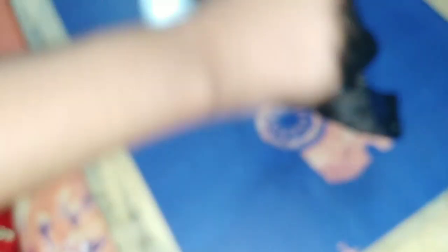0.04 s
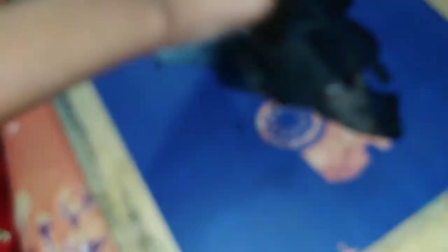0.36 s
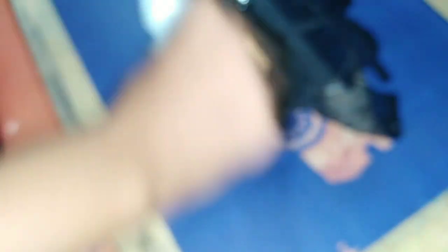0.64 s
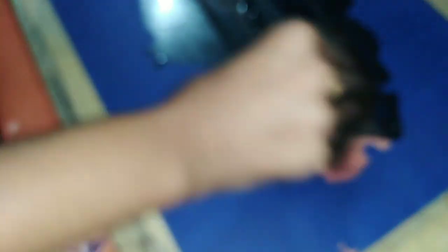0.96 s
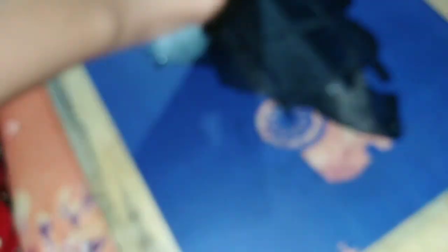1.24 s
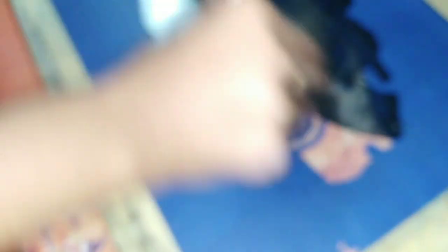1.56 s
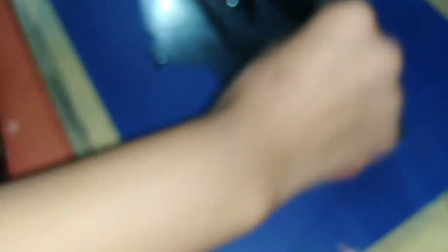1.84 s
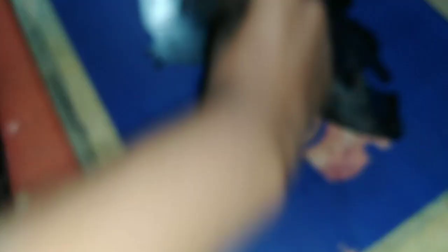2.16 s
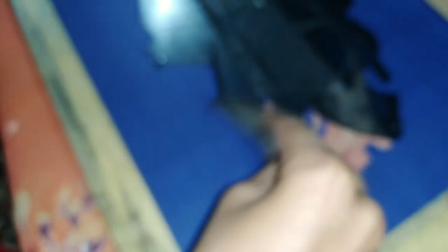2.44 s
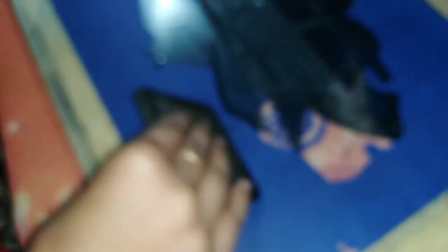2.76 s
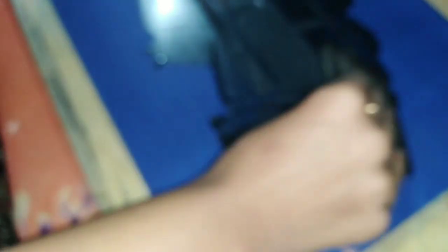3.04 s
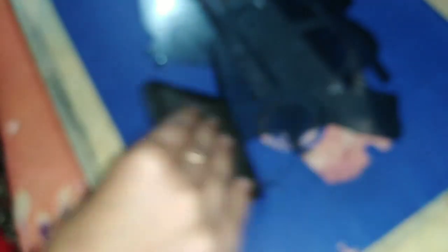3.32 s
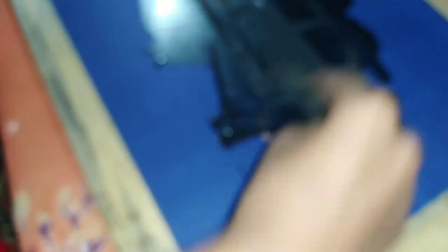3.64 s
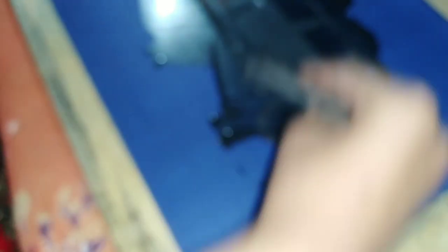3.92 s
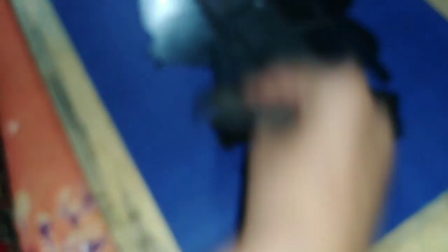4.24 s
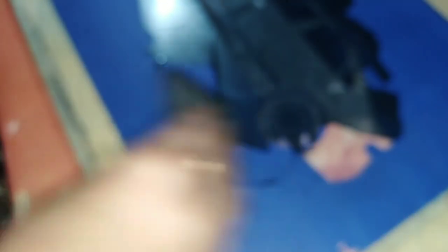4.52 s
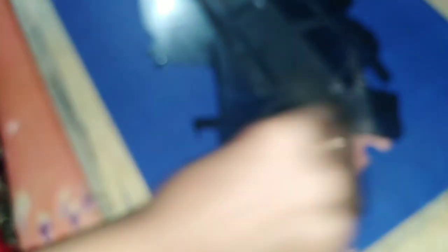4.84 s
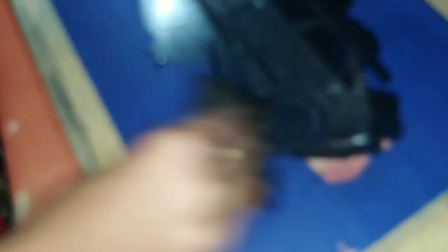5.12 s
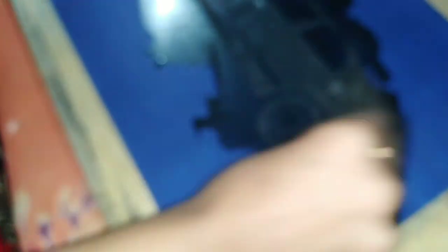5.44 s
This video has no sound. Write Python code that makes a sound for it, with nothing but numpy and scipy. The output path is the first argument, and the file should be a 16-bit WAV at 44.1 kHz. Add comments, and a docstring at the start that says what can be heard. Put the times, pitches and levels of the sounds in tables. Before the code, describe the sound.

A hand-held squeegee ticks down on a mesh stencil and scrapes ink across it, close to the microphone in a small, quiet room. Five short strokes come at about 0.2, 0.4, 0.8, 1.2 and 1.7 seconds. Each is a bright, scratchy hiss that swells and fades, with a high zip rising and falling as the blade crosses the threads, and tiny squeaks where it bites. A sharp tick lands at about 1.6 seconds. Around 2 seconds the hand rests, and the frame and cloth shuffle softly. Nine more strokes follow: one at 2.4 seconds, a quick run of four between 3.1 and 3.9, single ones at 4.4 and 4.9, and a fast pair at 5.3 and 5.5. Light ticks and soft knocks of the frame fall among them, notably just after 4 seconds and at 5 seconds.

```python
"""A hand-held squeegee inks fabric through a mesh stencil, close to a stereo microphone in a small room.
The blade ticks down and scrapes to and fro five times. The hand's speed sets how loud it hisses and how
high it zips across the threads; where it bites, it squeaks. Around two seconds in, the hand rests and
frame and cloth shuffle. Nine more strokes follow, with ticks and soft knocks among them."""
import sys
import numpy as np
from scipy import signal
from scipy.fft import rfft, irfft, next_fast_len
from scipy.io import wavfile
from scipy.ndimage import uniform_filter1d

SR = 44100
rng = np.random.default_rng(int(sys.argv[2]) if len(sys.argv) > 2 else 0)


def to_wav(sig):
    """Store sig (one row per channel, or 1-D mono) as 16-bit WAV at the path in sys.argv[1].

    Samples outside -1..1 are clipped; the rate is SR.
    """
    pcm = np.clip(np.atleast_2d(sig), -1, 1) * 32767
    pcm = np.round(pcm).astype(np.int16)
    wavfile.write(sys.argv[1], SR, pcm.T)  # frames by channels


N = 246116
TIME = np.arange(N) / SR

# The strokes, close to the microphone. Each row: fastest moment in seconds, seconds of speeding up,
# seconds to slow to half speed, top thread rate in Hz, then in relative dB: bright hiss, dull scrape,
# left minus right, zip against the scrape, blade ring.
STROKES = [ (.179, .205, 0.0736, 8120, -35, -39, 4, -2.5, 0),
           (.422, .148, 0.1372, 8010, -35.5, -39, 1.5, -2, 0),
           (0.785, .221, 0.0993, 7663, -41, -42, 0.77, -8.5, 0),
           (1.214, .189, 0.1118, 7922, -35, -39, 1.54, -5, -0.5),
           (1.672, .208, 0.092, 7715, -31.5, -35.5, 0.48, -1, -0.5),
           (2.435, .315, 0.1095, 7864, -38.5, -38.5, -0.99, -4, 2),
           (3.088, .268, 0.073, 7387, -36, -37.5, -0.13, -1, 3),
           (3.355, .172, 0.0677, 7198, -33, -36, 0.67, -3.5, 0),
           (3.537, .113, 0.1298, 6226, -34.5, -37, 1.46, -2, 5),
           (3.876, 0.32, 0.0735, 6685, -42.5, -42.5, 1, -3.5, -0.5),
           (4.404, .229, .085, 7657, -36, -35.5, -2, -3.5, 2.5),
           (4.922, .195, 0.0979, 7618, -32.5, -33, 0.58, -1, 0.5),
           (5.278, .19, 0.0717, 8054, -34.5, -35.5, 0.4, -1.5, 1.5),
           (5.469, .117, 0.1605, 7990, -31, -33, 1.5, -9.5, 0)]


def hand(t, hiss_db_per_doubling=10, dull_db_per_doubling=8):
    """The hand's speed drives hiss and scrape; gives these, side and blade ring in dB at times t."""
    fastest, push, slow, _, hiss_db, dull_db, side_db, _, ring_db = np.transpose(STROKES)[:, :, None]
    pace = speed(t, fastest, push, slow)
    power_sum = lambda db: 10 * np.log10(np.sum(amp(db) ** 2, axis=0))
    blend = lambda value: np.sum(pace * value, axis=0) / np.sum(pace, axis=0)
    hiss_db = power_sum(hiss_db + hiss_db_per_doubling * np.log2(pace))
    dull_db = power_sum(dull_db + dull_db_per_doubling * np.log2(pace))
    return hiss_db, dull_db, blend(side_db), blend(ring_db)


def speed(t, fastest, push, slow, push_curve=1.55, ease_curve=2.1):
    """The hand speeds up from rest, then eases off; 1 at its fastest."""
    rising = np.sin(np.pi / 2 * np.clip(1 + (t - fastest) / push, 0, 1)) ** push_curve
    easing = .5 ** ((np.maximum(t - fastest, 0) / slow) ** ease_curve)
    return rising * easing + 1e-9


# The rubbed mesh, heard close up. Each row: frequency in Hz, relative level in dB.
MESH_COLOUR = [(30, -26.5), (100, -8), (220, -10.5), (450, -16.5), (1100, -14), (1800, -12), (2300, -8),
               (2900, -10), (3500, -9.5), (4900, -10.5), (6000, -7.5), (7200, -3), (8400, -6),
               (9400, -12.5), (11500, -19), (13000, -22.5), (16000, -26)]


def scrape(level_db=-1.0566, blade_hz=5597, blade_octaves=.191, patch_db=3, sway_db=2.76):
    """Countless tiny slips of the blade on the mesh; fast strokes are louder and brighter."""
    slips = noise_pair(N)
    grit_db, judder_db = .6449 * flutter(N, hz=700), .5545 * flutter(N, hz=60)
    slips *= unit(amp(grit_db + judder_db))
    hz, t, spectrum = signal.stft(slips, SR, nperseg=256, noverlap=192)
    hiss_db, dull_db, side_db, ring_db = hand(t)
    mesh = amp(read(MESH_COLOUR, hz))
    band_db = lambda low, high: 10 * np.log10(np.mean(mesh ** 2 * (hz > low) * (hz < high)))
    bright = read([(3000, 0), (11000, 1)], hz)[:, None]
    stroke_db = bright * (hiss_db - band_db(9500, 15500))
    stroke_db += (1 - bright) * (dull_db - band_db(1800, 4200))
    # the blade's broad ring is stronger or weaker with the grip
    stroke_db += ring_db * np.exp(-.5 * (np.log2((hz[:, None] + 1) / blade_hz) / blade_octaves) ** 2)
    # uneven ink lets passing patches of the spectrum stand out
    patches = uniform_filter1d(rng.standard_normal(spectrum.shape), size=4, axis=1)
    patches = unit(uniform_filter1d(patches, size=10, axis=2))
    gain = mesh[:, None] * amp(level_db + stroke_db + patch_db * patches)
    bass_left_db = read([(450, 1.5), (1800, 0)], hz)[:, None]
    sway = np.interp(t, TIME, flutter(N, hz=12))
    pan = panned(side_db + bass_left_db + sway_db * sway)
    return signal.istft(spectrum * gain * pan, SR, nperseg=256, noverlap=192)[1][:, :N]


# The thread directions under the blade. Each row: share of the top thread rate, relative level in dB.
THREAD_DIRECTIONS = [(0.947, -1.5), (.59, 3.5), (.3, -5.5)]


def stroke_zips(fastest, push, slow, top_hz, zip_db, side_db, stall_pace=.272, lift_db_per_s=35):
    """Each thread direction sings at a pitch set by the hand's speed, fading as it lifts or stalls."""
    t = np.arange(max(fastest - push, 0), fastest + 2 * slow, 1 / SR)
    tremor = np.exp(.03 * flutter(len(t), hz=14))
    pace = speed(t, fastest, push, slow) * tremor
    contact_db = zip_db + 2.5 * np.log2(pace) - lift_db_per_s * np.maximum(t - fastest, 0)
    moving = pace ** 2 / (pace ** 2 + stall_pace ** 2)
    sound = 0
    for share, db in THREAD_DIRECTIONS:
        rate = share * top_hz * pace
        pressure_db = 4 * np.tanh(flutter(len(t), hz=18))
        level = moving * amp(contact_db + db + read(MESH_COLOUR, rate) + pressure_db)
        sound += zip_tone(rate, level, wobble=.02335, blur_hz=169.9, skew=.08, corner_db=-2.5, grab_db=7)
    return t[0], sound * panned(side_db)[:, None]


def zip_tone(rate, level, wobble, blur_hz, skew, corner_db, grab_db, lock_db=-22, weft_ratio=.475):
    """Each thread plucks the blade; in a hard bite the pitch steadies and cross threads beat with it."""
    size = len(rate)
    bite = level / (level + amp(lock_db))
    looseness = 1 - bite / 2

    def phase(hz):
        """The weave is uneven, so every thread rate jitters."""
        jitter_hz = (wobble * hz + blur_hz) * looseness * flutter(size, hz=600)
        return 2 * np.pi * np.cumsum(hz + jitter_hz) / SR

    warp, weft = phase(rate), phase(weft_ratio * rate)
    beats = 2 * bite * (amp(-17) * np.sin(warp - weft) + amp(-22) * np.sin(warp + weft))
    # the wrist turns, so one corner of the blade runs faster than its middle and the other slower
    turn = skew * flutter(size, hz=25)
    corners = np.sin(phase(rate * (1 + turn))) + np.sin(phase(rate * (1 - turn)))
    tone = np.sin(warp) + beats + amp(corner_db) * (1 - bite) * corners
    # the edge grips and lets go every few milliseconds
    grab = amp(grab_db * looseness * np.tanh(flutter(size, hz=260)) * np.sqrt(2))
    return level * unit(grab * tone) * signal.windows.tukey(size, .04)


# Bites into the mesh, left and right of the microphone. Each row: peak in seconds, relative level in dB,
# pitch in Hz, glide in Hz per second, fade time in seconds, left minus right in dB.
SQUEAKS = [ (0.137, -22.5, 7420, 50000, 0.0086, 3), (0.15, -11.5, 8340, -5000, 0.0041, 17.5),
           (.222, -40.5, 3750, -20000, 0.00976, -0.5), (.403, -36, 6500, 40003, 0.0185, -5),
           (.453, -15, 8283, -5000, 0.00684, 10.5), (.522, -38.5, 4200, -35000, .012, -4.5),
           (.555, -42.5, 2279, -50000, 0.00714, -3), (.813, -39, 2246, 0, 0.0071, 0.5),
           (1.148, -41, 2034, 29994, 0.0121, 2.5), (1.152, -22.5, 6144, 28004, 0.00682, 2.5),
           (1.175, -35, 6870, 35003.5, 0.0122, 3), (1.205, -42, 3950, 25004.5, 0.0143, 3),
           (1.21, -27.5, 7800, 12000, 0.0087, 18.5), (1.269, -32.5, 7360, -12000, 0.013, -15),
           (1.625, -26.5, 6850, 19997.5, .008, 0.5), (1.68, -23.5, 7540, -8000, 0.0161, 3.5),
           (1.705, -23, 6074, -35000, 0.0069, -0.5), (1.752, -39, 2400, -25000, 0.00666, 1),
           (2.392, -32.5, 4810, -0.5, .01, -2.5), (2.49, -53.5, 1467, -1000, 0.0518, -1),
           (2.838, -43.5, 1639, -55000, 0.0037, 1), (2.912, -40.5, 1236, 13497.5, 0.01588, -2),
           (2.956, -39.5, 2120, 7000, 0.0055, 7.5), (3.052, -30, 7300, 44999.5, 0.014, -3),
           (3.1, -33.5, 6142, -27000, 0.013, -3), (3.28, -30.5, 6620, 67999, .013, 1),
           (3.36, -23, 6330, 15000, 0.00607, -11), (3.39, -31, 7150, -1, .01, -0.5),
           (3.478, -36.5, 1445, 30000, 0.007, -5.5), (3.525, -37.5, 2631, 8994.5, .014, 1.5),
           (3.56, -37.5, 6137, -5000, 0.017, 0), (3.772, -34.5, 2448, 2998.5, 0.0046, 1.5),
           (3.88, -29.5, 6455, -3000, .009, -9.5), (4.262, -42.5, 1250, 35000, .011, -2),
           (4.29, -44, 2706, 44998.5, 0.0122, 3), (4.335, -43.5, 4310, 14999, 0.021, -2.5),
           (4.38, -36.5, 4597, -3000, .016, -3.5), (4.43, -37.5, 3620, -15000, 0.01665, -0.5),
           (4.395, -26.5, 7398, -0.5, .012, -7.5), (4.44, -30, 6680, -22000, .009, -2),
           (4.862, -27.5, 5827, 49998, 0.0088, -6.5), (4.89, -24.5, 7190, 24998, 0.0144, 0),
           (5.228, -23.5, 5988, 42000, 0.00462, -3), (5.28, -21, 8082, 0, 0.01117, 3.5),
           (5.43, -28, 6380, 38000, 0.0099, 2.5), (5.467, -20.5, 7780, 25001, .011, 9),
           (5.535, -28, 5110, -12000, 0.0083, -2)]


def squeak(s, db, hz, glide, fade, side_db, swell_ratio=.92):
    """A bite swells quickly and dies in a moment while its pitch slides; it is purer than the free zip."""
    t = np.arange(-3 * fade, 4 * fade, 1 / SR)
    from_peak = abs(t) / (fade * np.where(t < 0, swell_ratio, 1))
    level = amp(db) * np.exp(-.5 * from_peak ** 1.345)
    tone = zip_tone(hz + glide * t, level, wobble=.0121, blur_hz=35, skew=.05, corner_db=-7.5, grab_db=4.5)
    return s + t[0], tone * panned(side_db)[:, None]


# Ticks of the blade. Each row: start in seconds, level in dB, decay and rise in seconds.
BLADE_TICKS = [(.145, -22, 0.0022, .0005), (.45, -27.5, 0.0025, 0.0013), (.81, -24.5, 0.0116, 0.00328),
               (.932, -30, 0.0157, 0.0154), (1.018, -36.5, 0.0264, 0.0112), (1.086, -29.5, 0.0266, 0.0106),
               (1.3, -30, 0.0145, 0.0102), (1.505, -36, 0.0307, 0.0038), (1.628, -8, 0.00093, 0.00098),
               (2.182, -40.5, 0.025, .008), (2.83, -38, 0.067, .0005), (3.241, -28.5, .015, 0.0029),
               (3.769, -22.5, 0.00233, .0005), (4.033, -40.5, 0.00455, 0.00127),
               (4.05, -45, 0.0085, 0.00093), (4.132, -39, .0027, 0.00098), (4.199, -34, 0.0265, 0.0048),
               (4.704, -31, 0.0158, 0.0037), (4.73, -49, 0.034, .01)]


def tick(s, db, decay, rise):
    """The edge catches or touches down: a short scuff with the colour of the mesh."""
    t = TIME[:SR // 4]
    scuff = unit(colour(noise_pair(len(t)), lambda f: amp(read(MESH_COLOUR, f))))
    return s, amp(db) * scuff * np.exp(-t / decay) * (1 - np.exp(-t / rise))


# Soft knocks and shuffles near the microphone. Each row: start in seconds, level in dB,
# centre and width in Hz, rise and decay in seconds.
NUDGES = [(.144, -31, 587, 440, 0.00096, 0.0151), (.144, -41.5, 60, 300, 0.0019, 0.023),
          (.447, -30, 530, 517, 0.0016, 0.0111), (.447, -42.5, 60, 300, .002, 0.027),
          (.95, -50.5, 660, 800, 0.014, 0.085), (1.95, -50.5, 641, 137, 0.0312, 0.092),
          (1.965, -53.5, 2390, 2200, 0.0286, 0.423), (1.969, -49, 6023, 1560, 0.031, 0.374),
          (2.03, -51.5, 370, 292, 0.022, 0.142), (2.05, -55, 710, 382, 0.015, 0.42),
          (2.28, -40.5, 820, 500, 0.0386, 0.121), (2.182, -46, 150, 172, 0.0034, 0.031),
          (2.731, -42.5, 340, 390, 0.0267, 0.0632), (2.709, -52.5, 6813, 3508, 0.025, 0.0954),
          (4.034, -42.5, 628, 130, 0.00091, 0.0181), (4.134, -50, 634, 150, .001, 0.0089),
          (4.203, -36.5, 127, 130, 0.0038, 0.0121), (5.02, -35, 155, 222, 0.0016, 0.036),
          (5.02, -32.5, 1447, 630, 0.0023, 0.0207), (5.039, -41.5, 66, 40, 0.0072, 0.043)]


def nudge(s, db, hz, width_hz, rise, decay):
    """A soft push or knock excites one damped resonance of the blade, frame or cloth, on the side where the
    hand is."""
    t = TIME[:SR // 2]
    ring = unit(colour(noise_pair(len(t)), lambda f: 1 / (1 + (2 * (f - hz) / width_hz) ** 2)))
    envelope = np.exp(-t / decay) * (1 - np.exp(-t / rise))
    knock = unit(ring * envelope) * np.sqrt(np.mean(envelope ** 2))
    _, _, side_db, _ = hand(s + t)
    return s, amp(db) * knock * panned(.8 * side_db)


def reflections(x, count=9, first_s=.0006, last_s=.012, echo_db=-15, shadow_hz=1800):
    """Close treble echoes off hand and frame comb the hiss differently on each side of the microphone."""
    taps = np.zeros((2, SR // 20))
    for channel in taps:
        delays = np.geomspace(first_s, last_s, count) * rng.uniform(.8, 1.2, count)
        channel[np.round(delays * SR).astype(int)] += amp(echo_db) * rng.choice([-1, 1], count)
    echoes = signal.oaconvolve(x, taps, axes=1)[:, :N]
    treble = colour(echoes, lambda f: f ** 2 / (f ** 2 + shadow_hz ** 2))
    return (x + treble) / np.sqrt(1 + np.sum(taps[0] ** 2))


# The small room's ring. Each row: frequency in Hz, seconds to fall by 60 dB.
ROOM_DECAY = [(200, 0.316), (2500, 0.462), (8000, 0.349), (15000, 0.04)]


def room_tail(x, onset_s=.00043):
    """The walls return a diffuse tail whose top treble dies first."""
    hz, t, spectrum = signal.stft(rng.standard_normal((2, SR // 2)), SR, nperseg=256)
    envelope = amp(-60 * t / read(ROOM_DECAY, hz)[:, None]) * (1 - np.exp(-t / onset_s))
    tail = signal.istft(spectrum * envelope, SR, nperseg=256)[1]
    return signal.fftconvolve(x, tail / np.linalg.norm(tail[0]), axes=1)[:, :N]


# The quiet room behind the work. Each row: frequency in Hz, relative level in dB.
AIR_COLOUR = [(20, -24.5), (45, -13), (70, 1), (170, 3), (400, -21), (700, -16.5), (1300, -21), (2300, -12),
              (4000, -31.5), (7200, -17.5), (10000, -14.5), (15500, -34)]


def room_air(level_db=-65):
    """A faint, steady rumble and hiss fills the room."""
    return amp(level_db) * unit(colour(noise_pair(N), lambda f: amp(read(AIR_COLOUR, f))))


# The microphone's two channels. Each row: frequency in Hz, their likeness from 0 to 1.
CHANNEL_LIKENESS = [(60, 0.3), (300, 0.5), (700, 0.26), (3000, 0), (7000, 0)]


def noise_pair(size):
    """White noise for two channels that are more alike in the bass."""
    left, other = rng.standard_normal((2, size))
    likeness = lambda f: read(CHANNEL_LIKENESS, f)
    right = colour(left, likeness) + colour(other, lambda f: np.sqrt(1 - likeness(f) ** 2))
    return np.array([left, right])


def flutter(size, hz):
    """Random wandering, no faster than about hz."""
    noise = rng.standard_normal(next_fast_len(size + SR // 4))
    return unit(colour(noise, lambda f: 1 / (1 + (f / hz) ** 2)))[:size]


def colour(x, gain):
    """Filters by gain(Hz)."""
    size = x.shape[-1]
    return irfft(rfft(x) * gain(np.fft.rfftfreq(size, 1 / SR)), size)


def read(points, hz):
    """Joins (Hz, value) points on a log-frequency axis."""
    f, value = np.transpose(points)
    return np.interp(np.log(hz + 1), np.log(f + 1), value)


def panned(db):
    """Constant-power gains, with left db above right."""
    pair = amp(np.array([db, -db]) / 2)
    return pair / np.sqrt(np.mean(pair ** 2, axis=0))


def amp(db):
    """Decibels to gain."""
    return 10 ** (np.asarray(db) / 20)


def unit(x):
    """Scales to rms 1."""
    return x / np.sqrt(np.mean(abs(x) ** 2) + 1e-20)


def add(mix, s, sound):
    """Mixes a stereo sound in at time s."""
    part = mix[:, max(round(s * SR), 0):][:, :sound.shape[1]]
    part += sound[:, :part.shape[1]]


def scene(zip_db=1.5, zip_room_db=-9, touch_room_db=-12, scrape_room_db=-18):
    """Scrape, zips, squeaks and small touches close to the microphone, the quiet room behind them."""
    zips, touches = np.zeros((2, 2, N))
    for fastest, push, slow, top_hz, _, dull_db, side_db, zip_offset_db, _ in STROKES:
        add(zips, *stroke_zips(fastest, push, slow, top_hz, dull_db + zip_offset_db, side_db))
    for row in SQUEAKS:
        add(zips, *squeak(*row))
    zips *= amp(zip_db)
    for row in BLADE_TICKS:
        add(touches, *tick(*row))
    for row in NUDGES:
        add(touches, *nudge(*row))
    air = room_air()
    rub = reflections(scrape())
    to_walls = amp(zip_room_db) * zips + amp(touch_room_db) * touches + amp(scrape_room_db) * rub
    return rub + zips + touches + air + room_tail(to_walls)


def record(dry, ceiling=.78, cutoff_hz=15850):
    """The recorder rounds off the sharpest peaks, then limits the band."""
    rounded = dry / (1 + (dry / ceiling) ** 8) ** (1 / 8)
    lowpass = signal.firwin(511, cutoff_hz, window=("kaiser", 9), fs=SR)
    return signal.oaconvolve(rounded, lowpass[None], "same")


dry = scene()
out = record(dry)
to_wav(out)
```